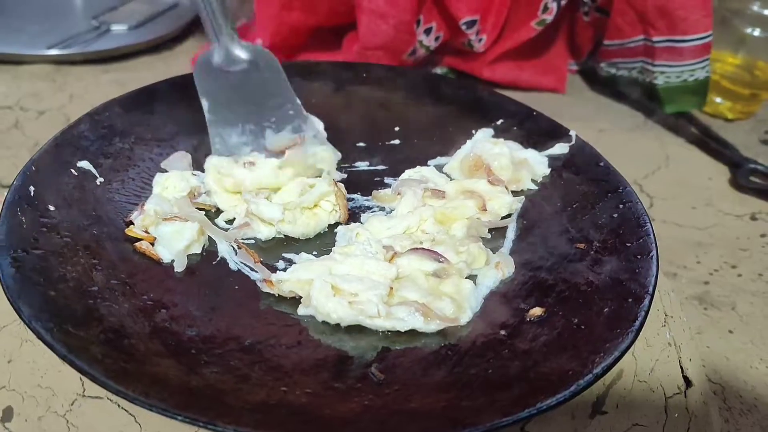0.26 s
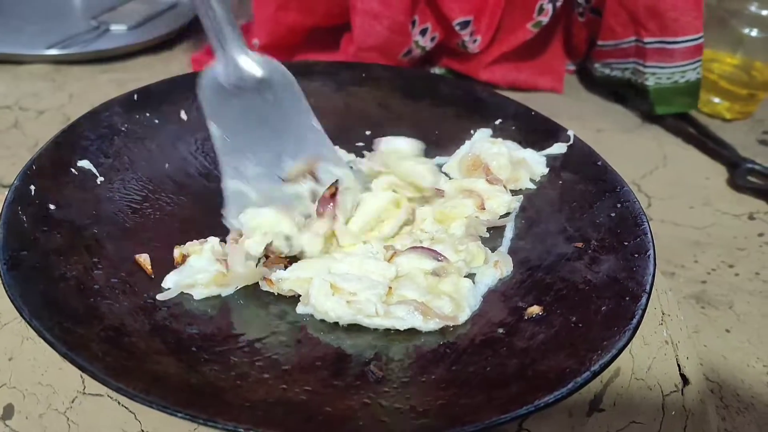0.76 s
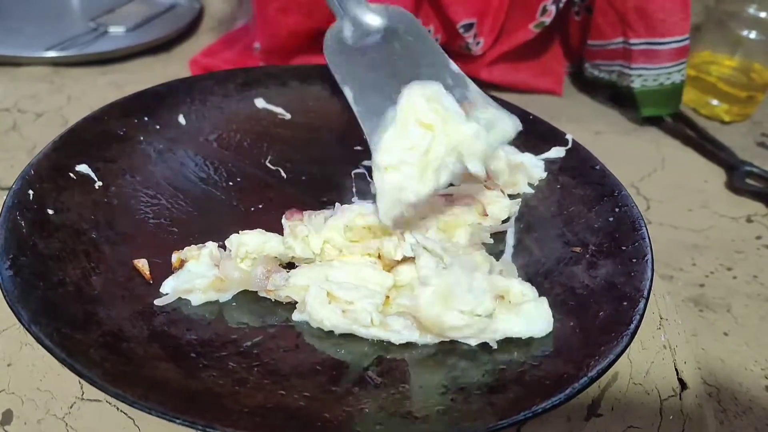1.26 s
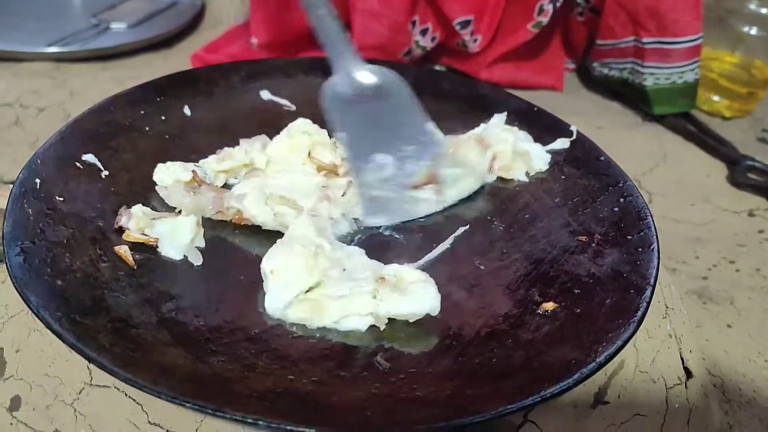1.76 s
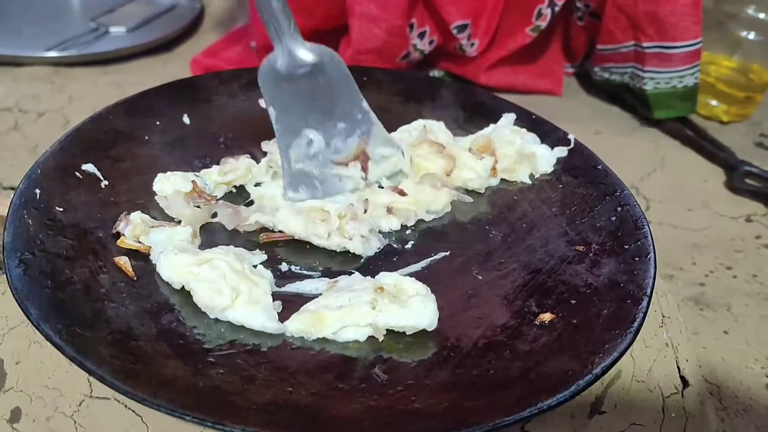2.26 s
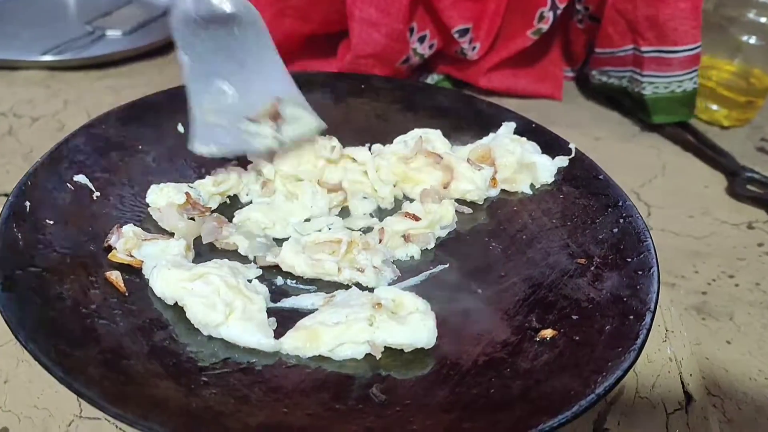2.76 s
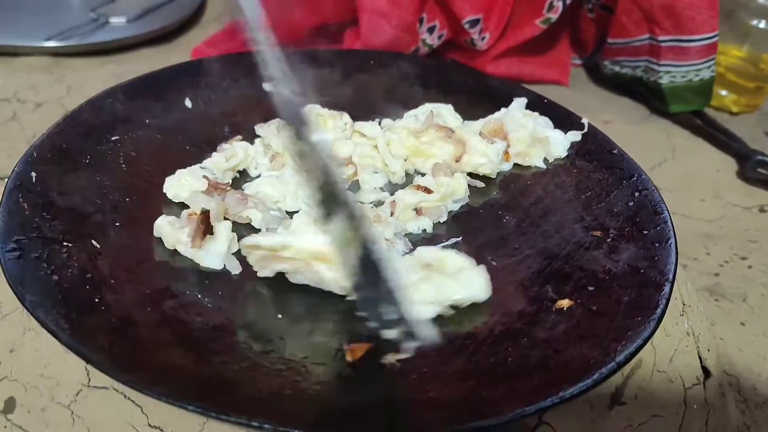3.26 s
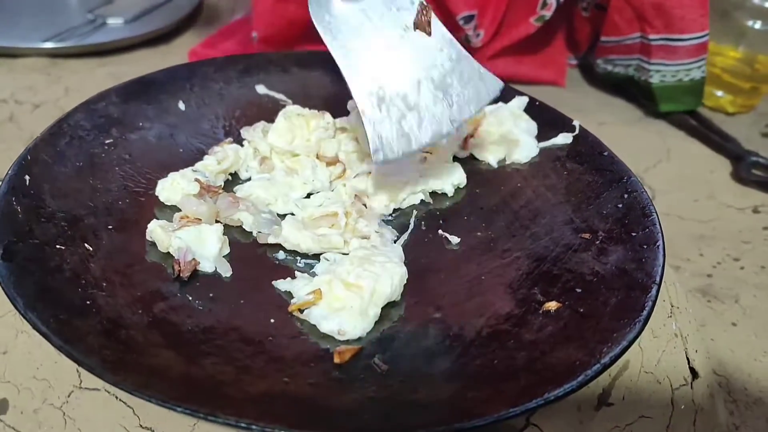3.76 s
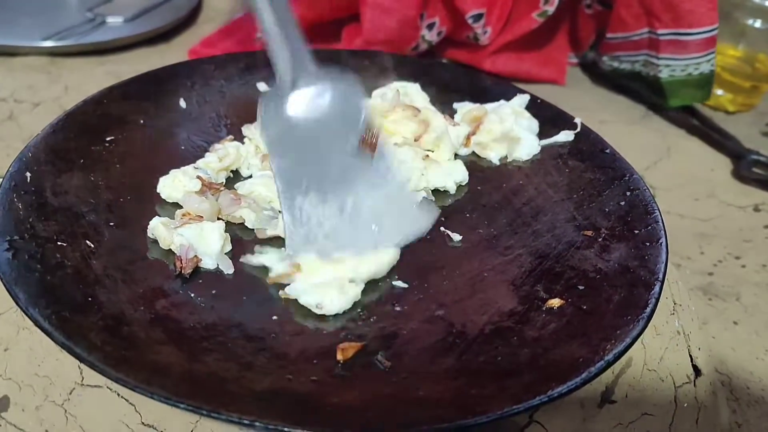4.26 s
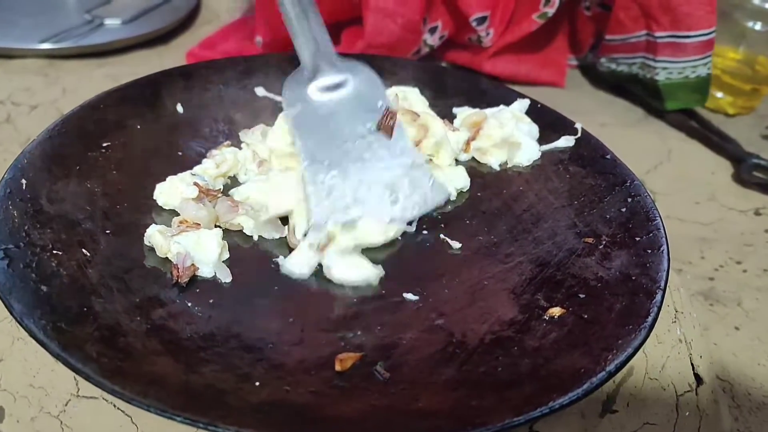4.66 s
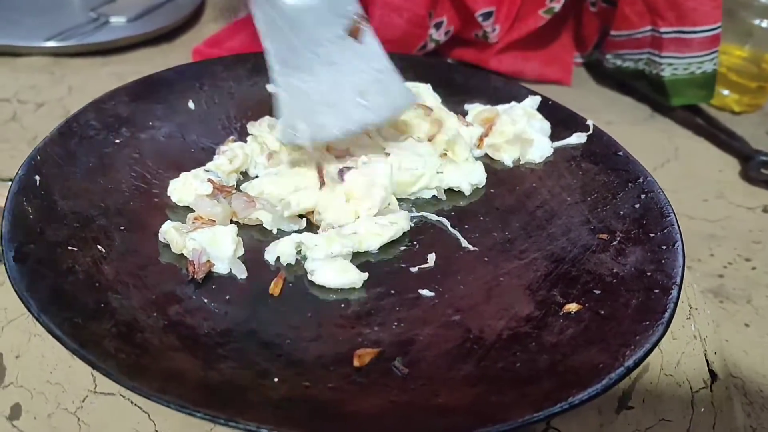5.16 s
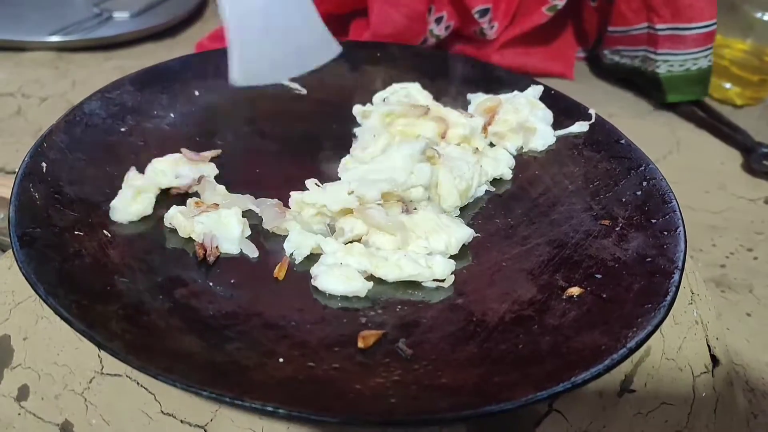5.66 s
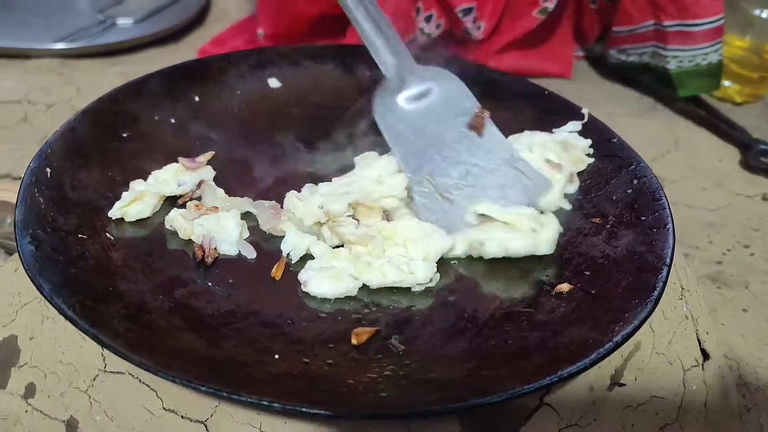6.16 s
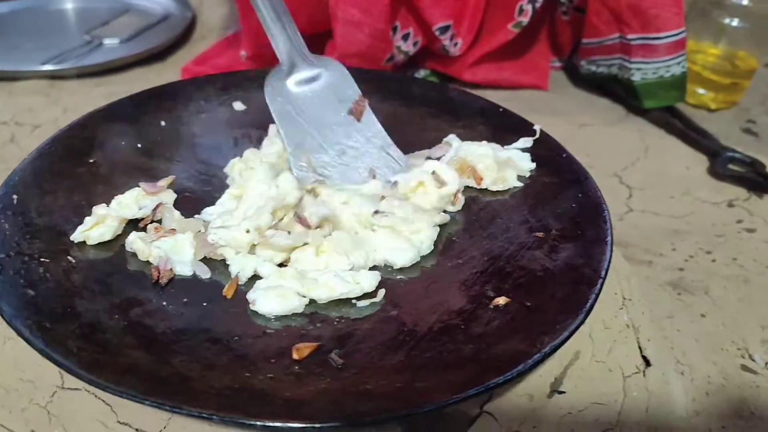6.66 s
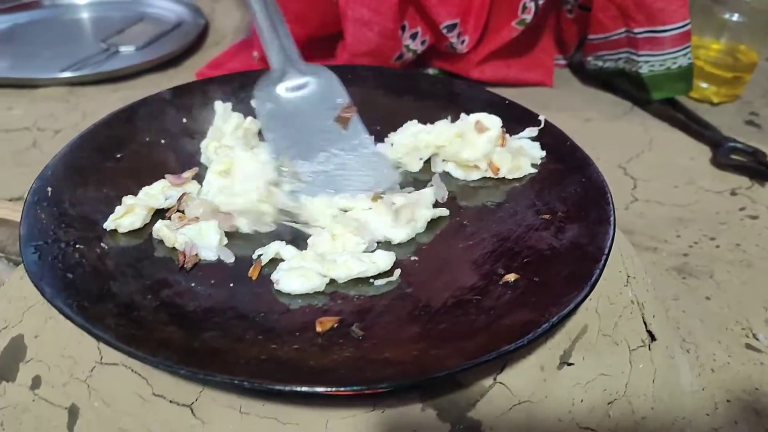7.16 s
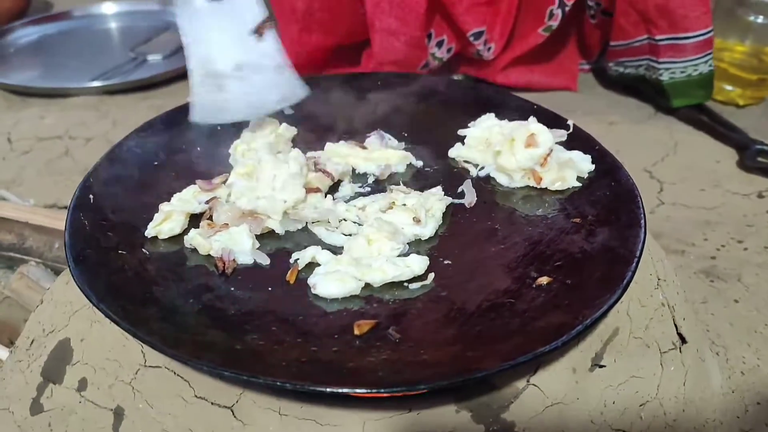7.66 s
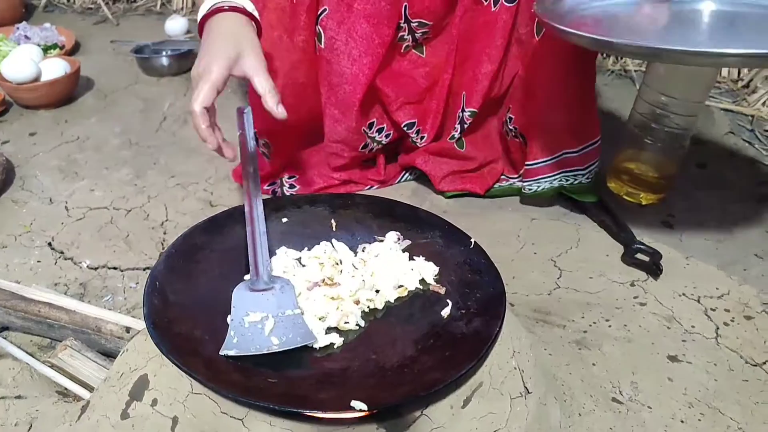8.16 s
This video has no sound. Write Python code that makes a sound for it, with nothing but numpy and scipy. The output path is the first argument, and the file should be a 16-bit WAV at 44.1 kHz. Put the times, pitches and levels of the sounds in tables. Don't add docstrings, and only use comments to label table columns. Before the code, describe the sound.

Close sizzling and popping of wet egg on iron, with bright ringing metal taps and gritty scrapes, then a brief dropout into quieter open air.

```python
import sys
import numpy as np
from scipy import signal
from scipy.fft import rfft, irfft, next_fast_len
from scipy.io import wavfile
from scipy.ndimage import uniform_filter1d

SR = 44100
rng = np.random.default_rng(int(sys.argv[2]) if len(sys.argv) > 2 else 0)


def amplitude_ratio(level_db):
    exponent = np.asarray(level_db, float) / 20
    return 10 ** exponent


def to_wav(sig):
    pcm = np.clip(np.atleast_2d(sig), -1, 1) * 32767
    pcm = np.round(pcm).astype(np.int16)
    wavfile.write(sys.argv[1], SR, pcm.T)


N = 371318

# start in seconds, peak level in dB, low part in dB.
POPS = [(0.0044, -6.5, -16.5), (0.0397, -13.5, -11.5), (0.2255, -23.5, -15), (0.549, -15, -17),
        (0.7633, -13, -14), (1.1725, -14, -21.5), (1.257, -15, -21), (1.4007, -9.5, -23),
        (1.4481, -7.5, -20.5), (1.5966, -14, -12.5), (2.059, -8.5, -18.5), (2.4086, -10, -15),
        (2.542, -12.5, -15.5), (2.9223, -9, -21), (3.5396, -12.5, -18), (3.691, -11.5, -16.5),
        (3.716, -16.5, -13.5), (3.8332, -11.5, -17), (3.9446, -22, -11.5), (4.087, -8, -17),
        (4.0994, -0.5, -19), (5.1975, -16, -18.5), (5.5075, -10, -22.5), (6.015, -8.5, -20.5),
        (6.251, -12, -23), (6.4366, -7.5, -23), (6.6512, -6, -17), (6.8496, -3.5, -14), (7.641, -12, -19),
        (7.9964, -8.5, -19.5)]
# start in seconds, peak level in dB.
SPITS = [(0.3718, -13), (0.5691, -9), (0.812, -15), (1.1233, -14.5), (1.3176, -10), (1.3399, -13),
         (1.4837, -6), (1.5645, -13.5), (1.774, -8), (1.8, -10), (1.8912, -4.5), (2.1273, -8),
         (2.284, -10.5), (2.369, -13.5), (2.782, -19), (2.869, -19), (3.5831, -8), (3.793, -10),
         (3.8575, -4), (4.0195, -12), (5.3778, -11.5), (5.6258, -10.5), (5.6693, -8.5), (6.0725, -13),
         (6.5094, -8), (6.782, -11.5), (6.9627, -4.5), (6.9985, -0.5), (2.976, -16), (4.093, -11),
         (5.7453, -5), (6.971, -22), (6.9768, -27), (7.245, -8.5), (2.86, -24), (7.4844, -6), (7.562, -14)]
# start in seconds, peak level in dB.
MORE_SPITS = [(1.1304, -28), (1.2614, -26), (1.306, -21.5), (1.5204, -21), (1.629, -21), (1.805, -14),
              (2.0884, -12.5), (2.4897, -22), (2.506, -11), (2.8834, -27), (2.9485, -22.5), (2.9702, -14.5),
              (3.2241, -17), (3.922, -21), (4.2827, -17), (4.6791, -11), (4.7626, -21), (5.3338, -31),
              (5.352, -22), (6.0388, -11), (6.345, -29), (6.6059, -35), (6.6353, -13), (6.858, -15),
              (6.9581, -6), (7.3347, -18), (7.6955, -14)]
# time in seconds, sizzle level in dB.
SIZZLE = [(0.0, -43.5), (0.29, -49), (1.07, -52), (1.65, -49.5), (1.79, -41.5), (2.91, -47), (3.49, -48.5),
          (4.11, -46.5), (4.52, -52), (4.85, -42.5), (5.39, -56), (5.68, -47), (5.92, -43), (6.51, -47.5),
          (7.13, -45.5), (7.36, -38), (7.6, -42.5), (8.03, -49)]
# start in seconds, peak in dB, flatness in dB, edge in dB, favoured mode in Hz.
TAPS = [(0.056, -25, -36, -4, 3860), (0.0798, -15.5, -32, -33, 3945), (0.291, -5.5, -18, -25, 3950),
        (0.6165, -8, -14, -7.5, 6700), (0.7472, -16, -31, -8.5, 4220), (0.9893, -8.5, -39, -10.5, 4056),
        (1.5926, -25.5, -20, 1, 4500), (2.6357, -7, -4.5, -14, 4040), (2.9943, -5.5, -40, -33, 3940),
        (3.0079, -13, -17, -37, 8000), (4.1092, -6.5, -9, -9.5, 3960), (4.3501, -8.5, -11, -52, 4305),
        (4.588, -8, -10.5, -35, 4280), (4.697, -30, -30, -26, 4056), (5.3959, -6, -34, -11, 4305),
        (5.739, -4, -50, -15, 4310), (6.664, -7, -11.5, -35, 6670), (7.1789, -15, -40, -26, 3950),
        (7.812, -6, -28, -11.5, 4800)]
TAP_CORNER_DB = [-3, -8, -3, 6, 1, -0.5, 2, -1, -4, 1.5, -3, 9.5, 6.5, -4, 0, 5.5, 2, -8, -2.5]
# pitch in Hz, level in dB, t60 in seconds, belly (+1 at the corner, -1 mid-blade).
BLADE_MODES = [(1788, -11, 0.014, -.1), (1749, -6, 0.14, 0.19), (1866, -7, 0.06, 1), (2205, -3, 0.068, .2),
               (2648, -5.5, 0.074, 0.2), (2965, -7, 0.045, -0.039), (3230, -11, 0.13, -0.46),
               (3402, -8.5, 0.081, 0.68), (3590, -8.5, 0.02, .3), (3950, 0, 0.092, -.6),
               (3940, -11, 0.26, -.9), (4305, -4.5, 0.09, 0.95), (4502, -7.5, 0.043, 0.49),
               (4800, -12.5, 0.22, -.6), (4852, -9, 0.15, 0.5), (5355, -7, 0.05, .6),
               (5500, -21.5, 0.29, .1), (5760, -7.5, 0.077, 0.072), (6382, -10, 0.11, 0.13),
               (6700, -6, 0.1, 0.37), (6817, -2, 0.015, 0.15), (7530, -3.5, 0.092, -1.3),
               (7800, -12, 0.066, 0.22), (7740, 2.5, 0.023, -0.1), (8070, 0, 0.12, -0.0058),
               (8287, -1.5, 0.02, -.1), (8190, -3.5, 0.099, 0.014), (8570, -9, 0.077, .1),
               (7180, -10, .06, 0.44), (9000, -16.5, .08, 0.62), (9580, -15, 0.16, -1.8),
               (10570, -25.5, 0.1, 0.42), (11500, -18, 0.08, 0.79), (12900, -17.5, 0.066, .1)]
# start in seconds, length in seconds, drag in dB, flatness in dB, tilt in dB.
PUSHES = [(0.653, 0.1, -27, -25, -6), (1.651, 0.073, -26, -20, -7.5), (1.771, 0.17, -28, -19, -8.5),
          (1.972, 0.16, -40.5, -23.5, -6.5), (2.404, 0.063, -38.5, -16.5, -7),
          (3.112, 0.057, -34, -18.5, -6), (3.218, 0.21, -36, -7.5, -1), (3.49, 0.029, -33, -17, -6),
          (3.596, .12, -40, -10, -13), (4.777, .32, -38, -11, -8.5), (5.997, 0.22, -42, -29, -15),
          (7.037, 0.043, -39.5, -8, 2), (7.269, 0.22, -35, -16.5, -6.5), (7.58, 0.19, -42, -40, -8)]
# peak time in seconds, half length in seconds, drag in dB, flatness in dB, tilt in dB.
FLICKS = [(0.0, 0.029, -40.5, -14, -20), (0.091, 0.027, -27.5, -17, -10), (1.028, 0.068, -32.5, -34, -1.5),
          (1.448, 0.045, -34, -24.5, -5.5), (2.506, 0.035, -28.5, -19.5, -12), (2.626, 0.013, -33, -6, -13),
          (2.668, 0.076, -34.5, -14.5, -8), (2.979, 0.034, -32.5, -20.5, -5),
          (3.29, 0.046, -24.5, -18, -3.5), (3.401, 0.06, -38.5, 3, 4), (3.86, 0.035, -49, -7, -27),
          (4.105, 0.029, -24.5, -17, 3), (4.162, 0.078, -36.5, -15, 2), (4.438, 0.049, -34.5, -13, -5),
          (4.614, 0.063, -31, -10.5, -4), (4.705, 0.043, -24, -21, -5), (4.947, 0.022, -34.5, -3, 10),
          (5.492, 0.093, -27, -25.5, -7.5), (5.854, 0.08, -17, -24, -8), (6.247, 0.11, -37.5, -10, -1),
          (6.686, 0.045, -27, -12.5, -3), (6.77, 0.059, -37, -8, -18), (7.179, 0.086, -26.5, -18.5, -2.5),
          (7.921, 0.053, -22.5, -18, -4)]
# drag in dB, flatness in dB, tilt in dB.
STIR = (-44, -25.5, -7.5)
# start in seconds, length in seconds, level over the drag in dB.
SKIMS = [(.62, 0.19, -19), (1.62, 0.098, -7.5), (1.754, 0.38, -7), (3.1, .17, -9), (3.27, 0.3, -28),
         (4.602, 0.57, -19.5), (5.42, .15, -18), (5.75, 0.14, -18), (7.015, .5, -10.5), (7.83, 0.23, -11)]
# time in seconds, level in dB.
SHOVE = [
    (3.3, -71),
    (3.38, -49.5),
    (3.43, -42.5),
    (3.482, -74),
    (3.52, -70.5),
]
# middle in seconds, half length in seconds, pitch in Hz, level in dB.
SWELLS = [(0.065, 0.049, 105, -42.5), (0.494, 0.22, 102, -42), (1.195, 0.083, 112, -42.5),
          (1.497, 0.44, 102, -45), (3.24, 0.31, 100, -51), (2.404, .7, 165.5, -50.5),
          (2.998, .04, 45.1, -38), (4.07, .12, 90, -48.5), (4.632, 0.201, 110, -42),
          (5.055, 0.11, 114, -45.5), (5.675, 0.12, 116, -49.5), (6.3, .28, 120, -42.5),
          (7.502, 0.39, 100, -44)]
# time in seconds, level in dB.
BREEZE = [(0.0, -51.5), (0.38, -60), (0.82, -56.5), (1.07, -53), (1.51, -57), (1.87, -55.5), (2.2, -55.5),
          (2.74, -53.5), (3.16, -54.5), (3.39, -53.5), (4.32, -55), (4.75, -53.5), (5.46, -56), (6.04, -56),
          (7.87, -54.5), (8.0, -54.5)]
# time in seconds, gain in dB.
SCENE_CHANGE = [
    (0, 1),
    (8.03, 0),
    (8.036, -74),
    (8.047, -67),
    (8.062, -49.5),
    (8.075, -18),
    (8.15, -10.5),
    (8.3, -7.5),
    (8.42, -3),
]
WIDE_SHOT_S = SCENE_CHANGE[1][0]

# frequency in Hz, level in dB per Hz.
HISS_COLOUR = [(710, -51), (1200, -10.5), (2700, -8.5), (4230, -9), (7650, 0), (9500, -6.5), (14600, -6.5),
               (15400, -13), (16500, -44.5)]
SPIT_COLOUR = [(1500, -25.5), (3000, -3), (4200, -1.5), (8000, 10), (9500, -1), (15500, -5), (16600, -46)]
PAN_COLOUR = [(150, -20), (280, -8), (600, -7.5), (1200, -5), (2200, -12), (4000, -17)]
THUD_COLOUR = [(200, -4.5), (400, -2.5), (800, 0.5), (1500, 4.5), (2300, -0.5), (4000, -15)]
DENSE_COLOUR = [(590, -47), (1000, -54), (1740, -8.5), (2070, -18.5), (2220, -15.5), (3630, -16), (3900, 1),
                (6090, -21), (7880, -1), (9070, -16), (14500, -21.5), (15900, -24.5), (16500, -63)]
SKIM_COLOUR = [(6000, -21), (8600, -2), (10000, -2), (13000, 1.5), (15500, -7.5), (16600, -49)]
GRIND_COLOUR = [(150, -33), (260, -9), (400, -7), (700, -13), (1200, -39)]
RUMBLE_COLOUR = [(12, -29), (20, -8), (32, 0.5), (70, -0.5), (108, -1), (172, -1.5), (253, -17), (300, -25),
                 (390, -23), (660, -120)]
# frequency in Hz, likeness from 0 to 1.
ALIKE = [(30, 0.82), (120, 1), (200, 1), (330, 0.82), (1000, 0.72), (3000, 0.035), (8000, 0.028),
         (15000, 0.083)]
# frequency in Hz, lean towards the left in dB.
LEAN = [(700, -0.17), (2500, -1), (4500, 0), (9000, 1.4), (13000, -0.5)]
LAG_S = -.00018


def unit(x):
    return x / np.sqrt(np.mean(x ** 2) + 1e-20)


def along(points, hz):
    f, v = np.transpose(points)
    return np.interp(np.log(hz + 1), np.log(f + 1), v)


def curves(rows):
    s, *cols = np.transpose(rows)
    return [np.interp(np.arange(N) / SR, s, c) for c in cols]


def wobble(rate, depth_db):
    knots = amplitude_ratio(depth_db * rng.standard_normal(int(N * rate / SR) + 2))
    return np.interp(np.arange(N) * rate / SR, np.arange(len(knots)), knots)


def noise():
    return rng.standard_normal((2, N))


def bursts(times, levels_db, t60, rise):
    kicks = np.bincount(np.round(times * SR).astype(int), amplitude_ratio(levels_db), N)[:N]
    t = np.arange(SR // 10) / SR
    return signal.fftconvolve(kicks, amplitude_ratio(-60 * t / t60) * (1 - np.exp(-t / rise)))[:N]


def coloured(pair, spectrum, lag_s=0):
    m = next_fast_len(N + 8192)
    hz = np.fft.rfftfreq(m, 1 / SR)
    turn = np.arccos(np.clip(along(ALIKE, hz), -1, 1)) / 2
    mid, side = rfft(pair, m) * unit(amplitude_ratio(along(spectrum, hz))) * [np.cos(turn), np.sin(turn)]
    lean = amplitude_ratio(along(LEAN, hz))
    left = (mid + side) * np.exp(-2j * np.pi * hz * lag_s) * lean
    right = (mid - side) / lean
    return irfft(np.array([left, right]), m)[:, :N]


def crowded(pair, depth_db):
    z = signal.stft(pair, nperseg=1024)[2]
    steady = uniform_filter1d(rng.standard_normal((z.shape[1], 1)), size=2, axis=0)
    drift = uniform_filter1d(rng.standard_normal(z.shape[1:]), size=2, axis=0)
    drift = uniform_filter1d(drift, size=8, axis=1)
    gain = unit(amplitude_ratio(depth_db * (0.38 * unit(steady) + 0.81 * unit(drift))))
    return signal.istft(z * gain, nperseg=1024)[1][:, :N]


def blend(level_db, *traits):
    power = amplitude_ratio(2 * np.maximum(level_db, -120))
    total = power.sum(0)
    rows = [10 * np.log10(total)] + [trait @ power / total for trait in traits]
    return curves(np.transpose([np.arange(power.shape[1]) / 1000, *rows]))


def steam_hiss(sizzle_db):
    grain = unit(wobble(9.7, depth_db=3.0) * wobble(90, depth_db=2.5) * wobble(900, depth_db=1.0))
    return coloured(amplitude_ratio(sizzle_db + 8.0) * grain * crowded(noise(), depth_db=6.5), HISS_COLOUR, LAG_S)


def pan_body(sizzle_db):
    body_db = -55.5 + 0.48 * (sizzle_db - sizzle_db.mean())
    return coloured(amplitude_ratio(body_db) * wobble(25, depth_db=5.5) * noise(), PAN_COLOUR)


def spitting(sizzle_db):
    thin_low_db = -30
    spits = [(s, db, thin_low_db) for s, db in SPITS]
    more_spits = [(s, db + 0.5, thin_low_db) for s, db in MORE_SPITS]
    s, db, low_db = np.transpose([*POPS, *spits, *more_spits])
    when, size = rng.random((800, 2)).T
    bubbles = bursts(when * (N - 1) / SR, 10 - 4 * np.log(size + 0.17), t60=0.011, rise=0.00025)
    bubbles *= amplitude_ratio(sizzle_db)
    late, loss = rng.random((len(s), 2)).T
    drops = bursts(s + 0.014 * (.5 + late), db - 17 * (.5 + loss), t60=0.01, rise=0.00025)
    bang = bursts(s, db - 3.0, t60=0.0065, rise=0.00043)
    spit = coloured((bubbles + bang + drops) * np.sign(noise()), SPIT_COLOUR, LAG_S)
    knock = bursts(s, db + low_db + 0.5, t60=0.017, rise=0.00092)
    return spit + coloured(knock * np.sign(noise()), THUD_COLOUR)


def frying():
    sizzle_db, = curves(SIZZLE)
    return steam_hiss(sizzle_db) + pan_body(sizzle_db) + spitting(sizzle_db)


def strokes():
    t = np.arange(N * 1000 // SR + 1) / 1000
    start, length, push_db, *push = np.transpose(PUSHES)[..., None]
    peak, half, flick_db, *flick = np.transpose(FLICKS)[..., None]
    press_db_per_s, lift_db_per_s = 344, 225
    before, after = np.maximum(start - t, 0), np.maximum(t - start - length, 0)
    pushes = push_db - press_db_per_s * before - lift_db_per_s * after
    flicks = flick_db - 15 * abs(t - peak) / half
    traits = [np.r_[a[:, 0], b[:, 0], stir] for a, b, stir in zip(push, flick, STIR[1:])]
    return blend(np.vstack([pushes, flicks, STIR[0] + 0 * t]), *traits)


def blade_ring(grit, drag_db, flat_db, tilt_db):
    s, db, tap_flat_db, _, favoured_hz = np.transpose(TAPS)
    bite = grit * amplitude_ratio(np.minimum(drag_db + 36, 0) - 1)
    flat, tilted = bite * amplitude_ratio(flat_db + 13.0), bite * amplitude_ratio(tilt_db + 5.0)
    at = np.round(s * SR).astype(int)
    luck = rng.standard_normal((len(s), len(BLADE_MODES)))
    scratch = rng.standard_normal(2 * N)
    out = np.zeros((2, N))
    for k, (hz, mode_db, t60, belly) in enumerate(BLADE_MODES):
        low, middle = hz < 3100, 4100 < hz < 6100
        fade, turn = amplitude_ratio(-60 / (t60 * SR)), 2 * np.pi * hz / SR
        drag = flat if low else tilted if middle else bite
        force = drag * wobble(16, depth_db=3.5) * scratch[rng.integers(N):][:N] * np.sqrt(1 - fade ** 2)
        favour = 5 * np.exp(-((hz - favoured_hz) / 90) ** 2) + belly * np.array(TAP_CORNER_DB)
        force[at] += amplitude_ratio(db - 11.5 + low * (tap_flat_db + 5.0) + favour + 2.03 * luck[:, k])
        resonator = [1, -2 * fade * np.cos(turn), fade ** 2]
        ring = signal.lfilter(amplitude_ratio(mode_db) * np.array([.5, 0, -.5]), resonator, force)
        lean, path = rng.standard_normal(2) * .6 + [np.log2(hz / 4500), 0]
        swing = 9 * np.log10(wobble(3.5, depth_db=2.5))
        quarter_cycle_late = np.roll(ring, round(SR / hz / 4))
        ring_left = np.cos(swing) * ring + np.sin(swing) * quarter_cycle_late
        out[0] += np.roll(ring_left, round(LAG_S * SR + 3 * low + 1.5 * path)) * amplitude_ratio(1.5 * lean)
        out[1] += ring * amplitude_ratio(-1.5 * lean)
    return out


def rasp_and_blows(grit):
    s, db, flat_db, edge_db, _ = np.transpose(TAPS)
    rasp = grit * amplitude_ratio(-6.5)
    crack = bursts(s, db - 12.5, t60=0.017, rise=0.00078) + bursts(s, db - 9.0, t60=0.14, rise=0.0022)
    edge = bursts(s, db + edge_db + 1.0, t60=0.063, rise=0.0019)
    thud = bursts(s, db + flat_db - 6.5, t60=0.038, rise=0.00022)
    dense = rasp * crowded(noise(), depth_db=10.5) + crack * crowded(noise(), depth_db=6)
    edge_colour = [(7000, -10.0), (9000, 8.0), (15500, -12.0), (16600, -47)]  # (Hz, dB per Hz)
    out = coloured(dense, DENSE_COLOUR, LAG_S) + coloured(edge * noise(), edge_colour, LAG_S)
    return out + coloured(thud * np.sign(noise()), THUD_COLOUR)


def edge_skim(grit):
    t = np.arange(N) / SR
    skim = grit * sum(amplitude_ratio(over_db) * (abs(t - start - length / 2) < length / 2)
                      for start, length, over_db in SKIMS)
    return coloured(skim * crowded(noise(), depth_db=6), SKIM_COLOUR, LAG_S)


def spatula():
    drag_db, flat_db, tilt_db = strokes()
    catch = unit(wobble(30, depth_db=2.0) * wobble(110, depth_db=1.65) * wobble(400, depth_db=1.5))
    grit = amplitude_ratio(drag_db) * catch
    grit[round(WIDE_SHOT_S * SR):] = 0
    return blade_ring(grit, drag_db, flat_db, tilt_db) + rasp_and_blows(grit) + edge_skim(grit)


def engine():
    middle, half, hz, db = np.transpose(SWELLS)[..., None]
    t = np.arange(N * 1000 // SR + 1) / 1000
    drone_db, drone_hz = blend(db - 12.5 * ((t - middle) / half) ** 2, hz[:, 0])
    turns = 2 * np.pi * np.cumsum(drone_hz * wobble(11, depth_db=0.6)) / SR
    return amplitude_ratio(drone_db) * wobble(8, depth_db=2.5) * (np.sin(turns) + .15 * np.sin(2 * turns))


def open_air():
    air_db, = curves(BREEZE)
    level_db = -47.5 + 4 * (np.arange(N) > WIDE_SHOT_S * SR) + air_db - air_db.mean()
    gusts = wobble(11, depth_db=2.0) * wobble(4, depth_db=2.2)
    return coloured(amplitude_ratio(level_db) * gusts * noise(), RUMBLE_COLOUR)


def food_shove():
    s, db = np.transpose(SHOVE)
    rock = np.interp(np.arange(N) / SR, s, amplitude_ratio(db), 0, 0) * wobble(50.1, depth_db=4.5)
    return coloured(rock * noise(), GRIND_COLOUR)


def scene():
    pan = frying() + spatula() + food_shove()
    return pan * amplitude_ratio([[.3], [-.3]]) + engine() + open_air()


def thinned(x, margin_db, spent_db, top_hz):
    hz, _, z = signal.stft(x, SR, nperseg=1024)
    power = uniform_filter1d(np.sum(abs(z) ** 2, axis=0), size=5, axis=1)
    band = uniform_filter1d(power, size=5, axis=0)
    short = np.kron(rng.standard_normal(np.array(power.shape) // 6 + 1), np.ones((6, 6)))
    short = short[:len(hz), :z.shape[2]]
    margin = margin_db * np.where(hz > 8500, .7, 1)[:, None]
    mask = uniform_filter1d(power, size=40, axis=0) * amplitude_ratio(2 * spent_db * short - 2 * margin)
    total = np.sum(abs(z) ** 2, axis=(0, 1))
    blow = total > 2.5 * uniform_filter1d(total, size=7)
    keep = (band > mask) & (hz < top_hz)[:, None] | (hz < 1800)[:, None] | blow
    z = z * np.maximum(keep, .005) * (hz < 16500)[:, None]
    return signal.istft(z, SR, nperseg=1024)[1][:, :N]


def band_limit(x):
    return signal.sosfilt(signal.butter(12, 16640, fs=SR, output="sos"), x)


def record(dry):
    overloaded = dry / (1 + abs(dry / 1.05) ** 4) ** .25
    camera = thinned(overloaded, margin_db=3.8, spent_db=3, top_hz=15700)
    fade_db, = curves(SCENE_CHANGE)
    return band_limit(camera * amplitude_ratio(fade_db))


dry = scene()
out = record(dry)
to_wav(out)
```